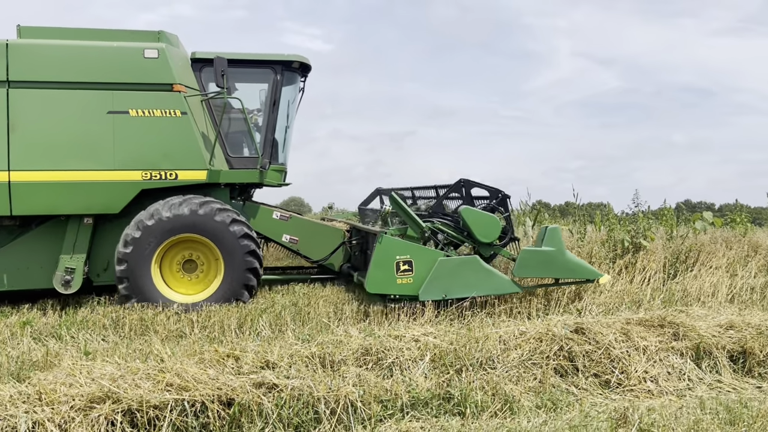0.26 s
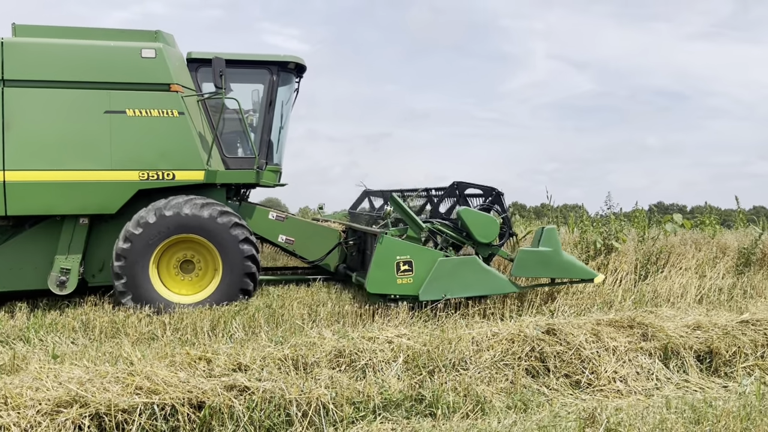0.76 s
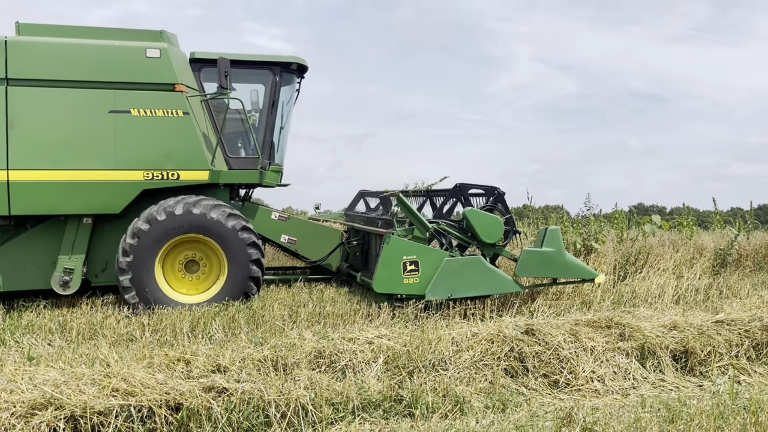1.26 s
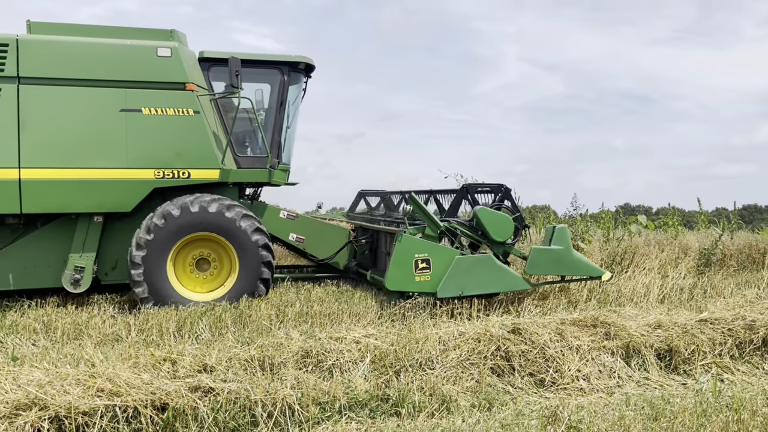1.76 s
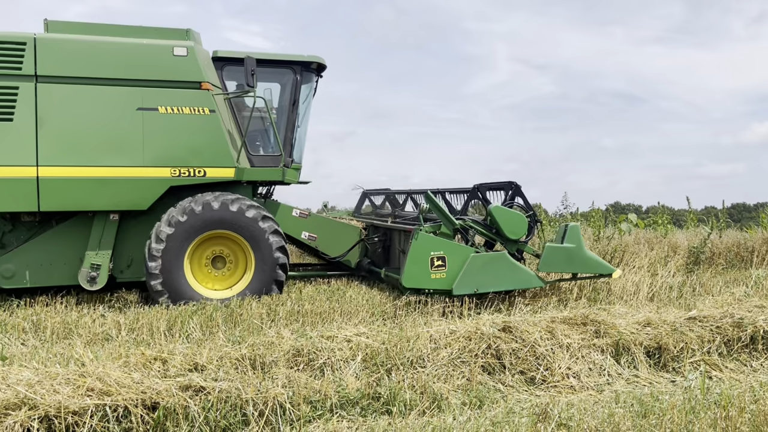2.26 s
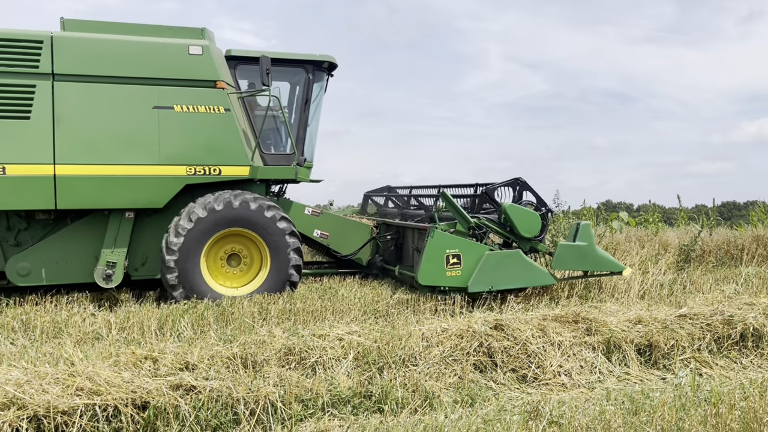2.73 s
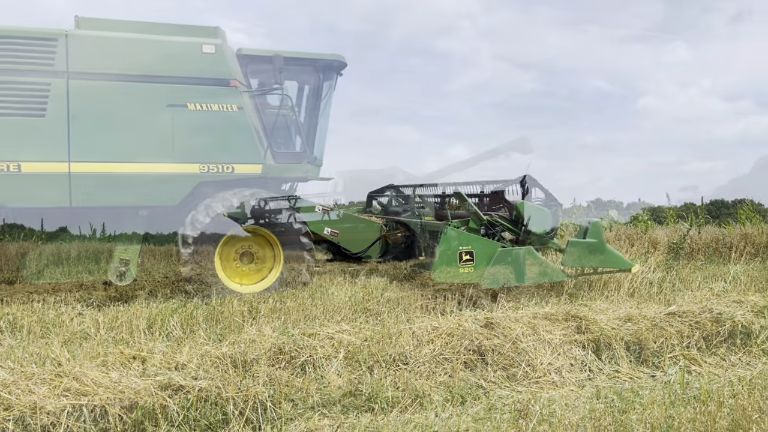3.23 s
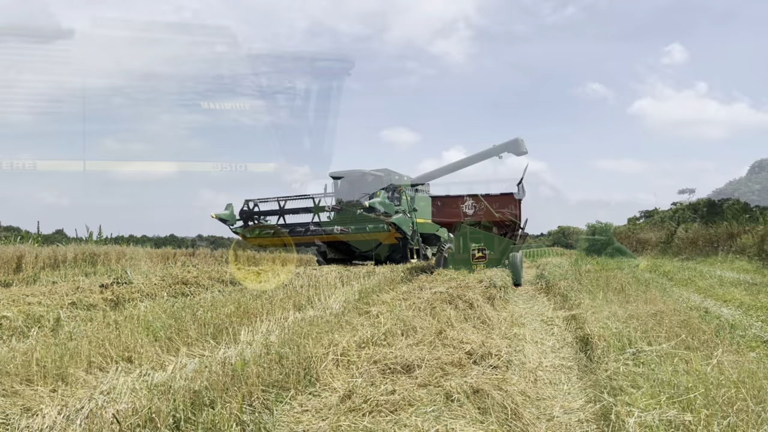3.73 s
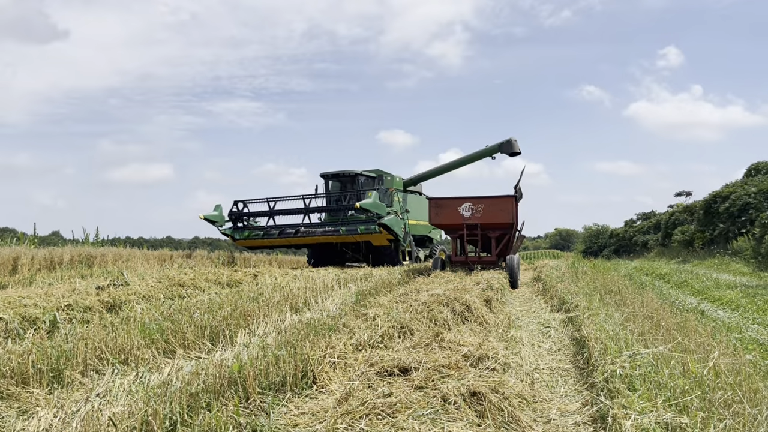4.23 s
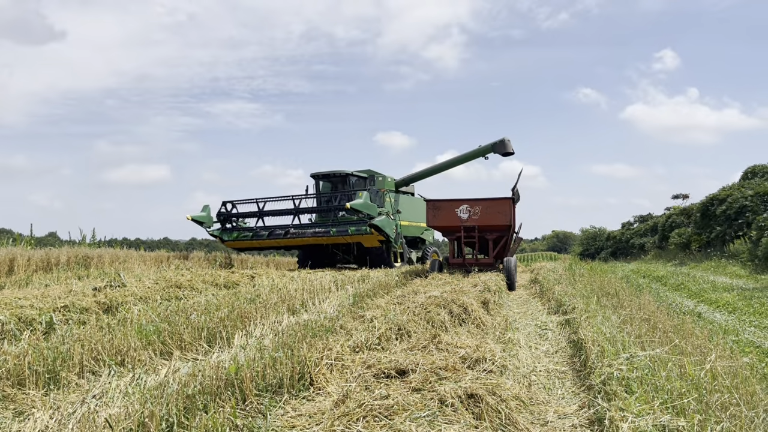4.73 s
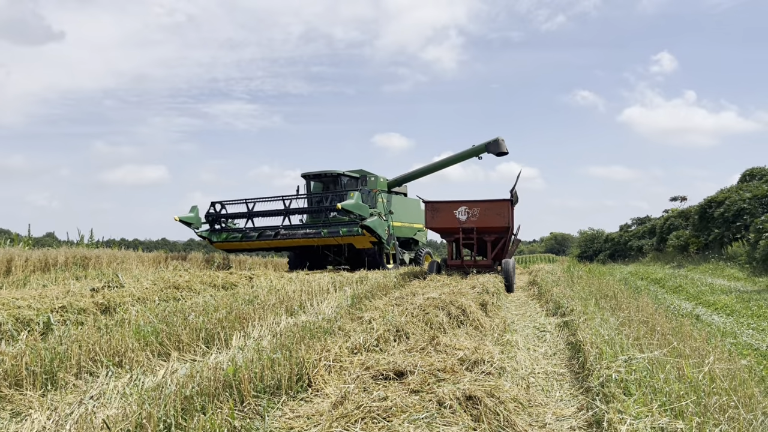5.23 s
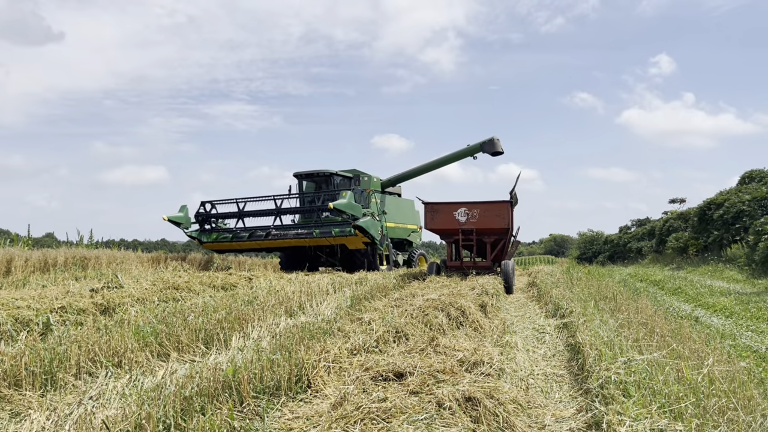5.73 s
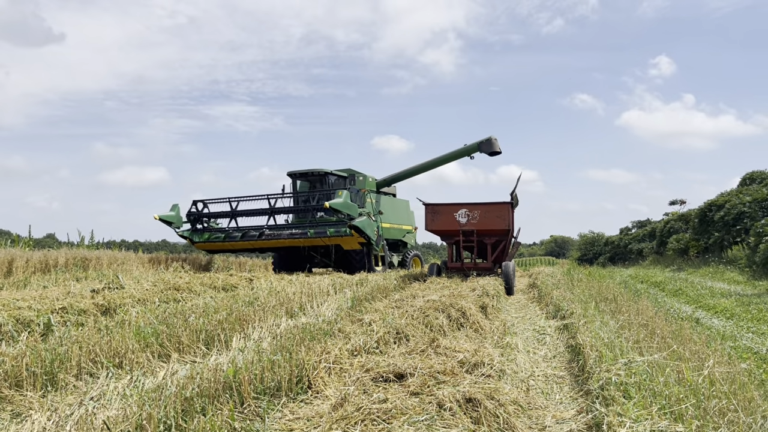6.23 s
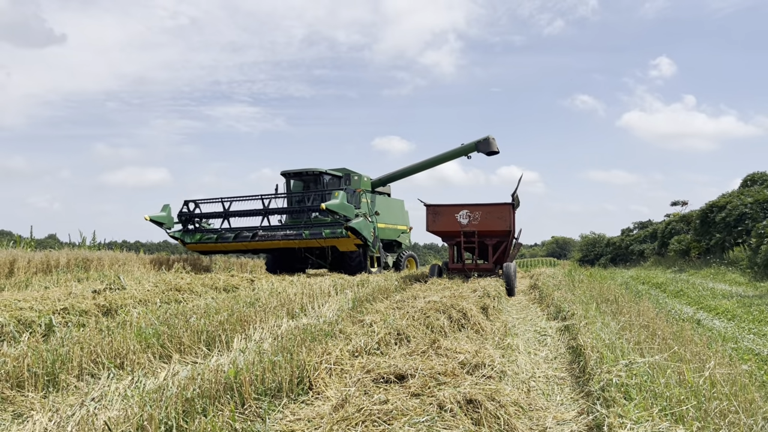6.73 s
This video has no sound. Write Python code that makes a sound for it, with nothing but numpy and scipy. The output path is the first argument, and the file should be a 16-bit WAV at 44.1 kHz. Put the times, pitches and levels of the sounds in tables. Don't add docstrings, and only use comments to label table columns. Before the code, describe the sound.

Loud threshing roar, pump whine and crackling straw at close range dissolve into softer twin engine drones, a thin whine and light wind buffeting.

```python
import sys
import numpy as np
from scipy import signal
from scipy.fft import rfft, irfft, next_fast_len
from scipy.io import wavfile
from scipy.ndimage import uniform_filter1d

SR = 44100
rng = np.random.default_rng(int(sys.argv[2]) if len(sys.argv) > 2 else 0)


def volts_from_db(level):
    exponent = np.asarray(level, float) / 20
    return 10 ** exponent


def pcm_store(signal):
    levels = np.round(np.clip(np.atleast_2d(signal), -1, 1) * 32767)
    wavfile.write(sys.argv[1], SR, levels.astype(np.int16).T)


N = 307818

# (start [s], end [s])
DISSOLVE = (3.0, 3.92)


def evened(x):
    return x / np.sqrt(np.mean(abs(x) ** 2) + 1e-20)


def read(points, hz):
    f, value = np.transpose(points)
    return np.interp(np.log(hz + 1), np.log(f + 1), value)


def columns(rows, t):
    s, *values = np.transpose(rows)
    return [np.interp(t, s, v) for v in values]


def bumps(t, s, height, half_s):
    return (height * np.exp(-((t[:, None] - s) / half_s) ** 2)).sum(axis=1)


def wander(rate):
    knots_per_s = 40
    knots = rng.standard_normal(int(N / SR * knots_per_s) + 4)
    smooth = signal.filtfilt(*signal.butter(2, np.clip(rate / 20, .01, .95)), knots)
    return np.interp(np.arange(N) / SR * knots_per_s, np.arange(len(knots)), evened(smooth))


def noise(spectrum, patchy_db, flicker_db):
    frames = N // 512 + 6
    hz = np.fft.rfftfreq(2048, 1 / SR)
    a, b, c, d, patches = rng.standard_normal((frames, len(hz), 5)).T
    patches = uniform_filter1d(patches, size=14, axis=0)
    patches = evened(uniform_filter1d(patches, size=4, axis=1))
    level = volts_from_db(read(spectrum, hz)[:, None] + patchy_db * patches)
    z = np.array([a + 1j * b, c + 1j * d]) * level
    pair = evened(signal.istft(z, nperseg=2048, noverlap=1536)[1][:, :N])
    return pair * volts_from_db(flicker_db * wander(28))


def whine(hz, db, rough):
    turns = np.cumsum(hz * np.ones(N)) / SR + rng.random()
    height = 1 + rough * wander(5.3)
    shake = rough * wander(19.6)
    return np.sqrt(2) * volts_from_db(db) * (height * np.exp(2j * np.pi * turns + 1j * shake)).real


def ports(direct, diffuse, table):
    size = next_fast_len(N)
    hz = np.fft.rfftfreq(size, 1 / SR)
    f, *values = np.transpose(table)
    same, lead, balance_db = (np.interp(hz, f, v) for v in values)
    treble = np.clip((hz - 8000) / 400, 0, 1)
    bass = np.clip(1.5 - hz / 300, 0, 1)
    same = np.clip(same + treble * (.9 - same) + 0.59 * bass * (1 - same), 0, 1)
    in_step_hz, turn_hz = 8620, 3270
    lead += treble * (2 * np.pi * (hz - in_step_hz) / turn_hz - lead)
    tilt = volts_from_db(balance_db * (1 - treble) / 2)
    tones, left, other = rfft(direct, size), rfft(diffuse[0], size), rfft(diffuse[1], size)
    right = (tones + same * left) * np.exp(1j * lead) + np.sqrt(1 - same ** 2) * other
    return irfft(np.array([(tones + left) * tilt, right / tilt]), size)[:, :N]


# (frequency [Hz], level [dB per Hz])
WIND = [(25, -24), (40, -8), (55, 7), (75, 5), (110, -1), (160, -7.5), (230, -9.5), (350, -22), (500, -54)]
# (time [s], peak level [dB], half length [s])
GUSTS = [(3.942, -33, 0.059), (4.082, -38, 0.059), (4.23, -30, .05), (4.377, -30, 0.047), (4.501, -39, .05),
         (5.12, -31, 0.038), (5.52, -33, 0.034), (5.686, -37, .03), (5.797, -34, 0.038),
         (5.987, -28.5, 0.035), (6.516, -40, 0.028), (6.89, -45, 0.032)]


def wind(t):
    lull_db, shared = -52, .25
    s, gust_db, half_s = np.transpose(GUSTS)
    strength = volts_from_db(lull_db) + bumps(t, s, volts_from_db(gust_db), half_s)
    eddies = strength * noise(WIND, patchy_db=2.5, flicker_db=1.5)
    return eddies + shared * eddies[::-1]


def shafts(lines, rough):
    return sum(whine(hz + waver_hz * wander(3.26), db, rough) for hz, db, waver_hz in lines)


def rattle(per_s, spread_db, level_db):
    size = volts_from_db(spread_db * np.minimum(rng.exponential(1, N), 4)) * (rng.random(N) < per_s / SR)
    kind = rng.integers(0, 40, N)
    t = np.arange(1200) / SR
    out = np.zeros(N)
    for k, hz in enumerate(np.geomspace(2300, 11500, num=40)):
        ping = np.sin(2 * np.pi * hz * t) * volts_from_db(-60 * t / 0.013)
        out += signal.oaconvolve(size * (kind == k), ping)[:N]
    return evened(out) * volts_from_db(level_db)


# (time [s], level above steady [dB])
BUNCHES = [
    (.5, 0.5),
    (0.781, 1),
    (1.94, 1.5),
    (2.58, 2.5),
    (3.05, 1),
    (4.5, 1),
    (5, 2.5),
    (5.95, 0),
    (6.4, 2),
]


def straw(t, colour, throb, level_db, patchy_db, flicker_db, spread_db):
    s, db = np.transpose(BUNCHES)
    swell_db = bumps(t, s, db, half_s=0.058)
    hiss = throb * noise(colour, patchy_db, flicker_db) + rattle(500, spread_db, level_db=-20)
    return volts_from_db(level_db + swell_db) * hiss


# (time [s], peak level [dB], ring pitch [Hz])
CLACKS = [(0.3294, -32, 8460), (0.7994, -28, 4400), (1.0694, -29, 8220), (1.1494, -25, 4610),
          (1.3164, -35, 6908), (1.9194, -32, 8726), (1.9594, -35, 8564), (2.3494, -26, 8350),
          (2.5894, -27, 4314), (2.7204, -19, 6003), (2.9294, -39, 8410), (3.3994, -28, 8750),
          (4.1495, -40, 8500), (4.4194, -50, 4500), (4.9494, -50, 8560), (4.9894, -41, 4400),
          (5.0993, -44, 6470), (5.4241, -42, 4500), (5.4494, -48, 4470), (5.6194, -47, 7500),
          (5.9085, -40, 4610), (6.1994, -49, 4500), (6.6594, -40, 7460)]
# (time [s], peak level [dB], ring pitch [Hz])
PINGS = [
    (0.9562, -25, 11100),
    (1.3594, -31, 7660),
    (1.4473, -24.5, 5400),
    (1.5894, -36, 7690),
    (5.7369, -44, 10920),
    (6.3619, -40, 8300),
    (3.802, -35, 9300),
]
# (time [s], peak level [dB], ring pitch [Hz])
SNAPS = [
    (.4818, -7.5, 7660),
    (2.499, -28, 3100),
    (2.7095, -12, 8350),
    (3.4, -29, 1900),
]
# (time to fall 60 dB [s], ring share [0-1])
CLACK_RING, PING_RING, SNAP_RING = (0.052, 0.12), (.06, 0.36), (0.011, 0.11)


def clacks():
    out = np.zeros(N + 4000)
    t = np.arange(4000) / SR
    kinds = (CLACKS, CLACK_RING), (PINGS, PING_RING), (SNAPS, SNAP_RING)
    knocks = [row + kind for rows, kind in kinds for row in rows]
    bright = signal.butter(2, [3000, 12000], "band", fs=SR)
    cracks = evened(signal.lfilter(*bright, rng.standard_normal((len(knocks), 4000))))
    rise = 1 - np.exp(-t / .001)
    for (s, db, hz, t60, ring), crack in zip(knocks, cracks):
        blend = 0.34 * crack + ring * np.sin(2 * np.pi * hz * t)
        out[round(s * SR):][:4000] += volts_from_db(db - 60 * t / t60) * rise * blend
    return out[:N]


def pump(rows, voicing, rest, rough):
    hz, effort_db, bite_db = columns(rows, np.arange(N) / SR)
    faster = hz - np.mean(rows, axis=0)[1]
    out = np.zeros(N)
    for k, db, per_hz, share in voicing:
        out += whine(k * hz, effort_db + db + per_hz * faster + share * bite_db, rough)
    for k, db in rest:
        out += whine(k * hz, db, 2 * rough)
    return out, np.cumsum(hz) / SR


# (time [s], piston rate [Hz], effort [dB], valve bite [dB])
FAR_PUMP = [
    (3.4, 379.6, -37.5, 6),
    (3.8, 378.8, -44, -8),
    (4.1, 375.8, -50.5, 1),
    (4.7, 374.9, -46, -3),
    (5.1, 378.3, -48.5, 2),
    (5.8, 382, -47, 0),
    (6.35, 377, -47.5, 7),
    (6.6, 376.3, -46, 2.5),
    (6.98, 374, -45.5, -1),
]
# (multiple [-], level over effort [dB], level per speed [dB per Hz], valve share [-])
FAR_VOICING = [(1, 1.5, 0.16, 0), (2, -11, 0.95, .5), (4, -13.5, -1.1, 0.4), (5, -11, -0.35, 0.88)]
# (multiple [-], level [dB])
FAR_PUMP_REST = [(2.24, -60.5), (3, -69), (6, -66), (7, -71), (8, -70), (10, -71)]
# (frequency [Hz], level [dB], waver [Hz])
FAR_SHAFTS = [(38.3, -43.5, .2), (76.8, -40.5, .2), (84, -35, .2), (126, -47, .4), (153, -51, .5),
              (168, -48, 1), (187, -43.5, 2), (268, -59, .6), (418, -61, 1), (920, -63, 2), (1210, -66, 2)]
# (frequency [Hz], level [dB per Hz])
FAR_ROAR = [(24, -36), (40, -1), (60, -8.5), (92, -3), (129, -3.5), (184, -5), (284, -18.5), (375, -12.5),
            (424, -20.5), (535, -22.5), (824, -22.5), (992, -20.5), (1410, -27), (1480, -42), (1600, -45),
            (2080, -58), (3520, -120)]
# (frequency [Hz], level [dB per Hz])
FAR_HISS = [(1200, -36), (1500, 1), (2100, -2.5), (3000, -7.5), (3700, -8), (4000, -11.5), (5500, -14.5),
            (7000, -18), (8500, -17.5), (10500, -13.5), (11200, -16.5), (12000, -25.5), (12700, -26),
            (13300, -59)]
# (frequency [Hz], likeness [0-1], right leads by [rad], left minus right [dB])
FAR_PORTS = [(40, 0.88, -0.0, 1.1), (300, 0.85, 0.0, 1.5), (700, 0.24, -0.2, -0.3), (1100, 0.59, 0.3, 0.4),
             (1500, 0.64, 1.0, -0.8), (2000, 0.35, 0.8, 0.8), (2400, 0.47, -0.8, -0.8),
             (2900, 0.69, -1.4, 2.2), (3500, 0.69, -1.4, 2.6), (4200, 0.36, -1.0, 0.9),
             (5100, 0.11, -0.6, 1.8), (6000, 0.46, -0.2, 0.8), (7200, 0.41, -1.2, 2.1),
             (8000, 0.73, -0.6, 0.6)]


def far_view(t):
    whines, turns = pump(FAR_PUMP, FAR_VOICING, FAR_PUMP_REST, rough=.12)
    tones = whines + shafts(FAR_SHAFTS, rough=0.023) + clacks() * (t > 3.9)
    pulsing = 1 + .08 * np.cos(2 * np.pi * turns)
    body = volts_from_db(-35) * noise(FAR_ROAR, patchy_db=-0.1, flicker_db=-1.24)
    body += straw(t, FAR_HISS, pulsing, level_db=-49.5, patchy_db=1.7, flicker_db=0.6, spread_db=2.5)
    fade = np.interp(t, DISSOLVE, (0, 1)) ** 1.15
    return (ports(tones, body, FAR_PORTS) + wind(t)) * fade


# (time [s], piston rate [Hz], effort [dB], valve bite [dB]); the last rise slows the tones' fade-out
NEAR_PUMP = [(0, 257.6, -24.5, 0), (.2, 258.5, -26.5, -5), (.5, 260.7, -26.5, -6), (.8, 262.2, -28.5, -7.5),
             (1.05, 262, -30, 4), (1.5, 259.5, -30.5, 3.5), (1.85, 260.2, -27, -3), (2.25, 262.5, -30, 4),
             (2.6, 263.7, -25.5, 2.5), (3.1, 263.4, -25.5, -2.5), (3.55, 263.4, -25.5, 0),
             (4, 264, -19, -4)]
# (multiple [-], level over effort [dB], level per speed [dB per Hz], valve share [-])
NEAR_VOICING = [(1, 0.5, 0, -0.14), (2, -14, -0.74, -0.44), (5, -10, 0.05, 0.79)]
# (multiple [-], level [dB])
NEAR_PUMP_REST = [(3, -45), (4, -57), (5.11, -47), (4.89, -54), (9, -56), (9.22, -56), (10, -56)]
# (frequency [Hz], level [dB], waver [Hz])
NEAR_SHAFTS = [(38.6, -48, .6), (52, -44, 1), (64.6, -37.5, 2), (76, -40, 2), (116.5, -38, 1),
               (137, -39, 1), (349, -37, 2), (980, -49, 6), (6886, -66, 6)]
# (frequency [Hz], level [dB per Hz])
NEAR_ROAR = [(15, -42), (25, -15), (44, -29), (65, -5.5), (124, -6.5), (205, -6), (262, -6), (301, -4),
             (377, -3), (455, -7.5), (490, -14.5), (563, -14), (983, -15), (1210, -18.5), (1300, -18.5),
             (1440, -29), (1600, -52), (2080, -49.5), (3520, -120)]
# (frequency [Hz], level [dB per Hz])
NEAR_HISS = [(1200, -22), (1450, -4), (1800, 1.5), (2050, -3.5), (2450, 0), (2750, -5.5), (3050, -8.5),
             (5000, -13), (7000, -17), (7600, -12.5), (9000, -12), (10400, -8), (11800, -17.5),
             (13300, -31)]
# (frequency [Hz], likeness [0-1], right leads by [rad], left minus right [dB])
NEAR_PORTS = [(40, 0.98, -0.1, 1.4), (300, 0.99, -0.3, 2.0), (700, 0.93, -0.6, 4.1),
              (1100, 0.81, -0.8, 5.2), (1500, 0.09, -0.6, 2.6), (2000, 0.11, 3.1, 1.8),
              (2400, 0.77, -0.5, -1.0), (2900, 0.46, -1.3, 4.0), (3500, 0.72, -0.7, 3.7),
              (4200, 0.75, -0.6, 2.2), (5100, 0.42, -1.7, 4.2), (6000, 0.62, -0.1, 3.0),
              (7200, 0.55, -0.8, 3.9), (8000, 0.85, -0.7, 1.1)]


def near_view(t):
    fade = np.interp(t, DISSOLVE, (1, 0))
    whines, _ = pump(NEAR_PUMP, NEAR_VOICING, NEAR_PUMP_REST, rough=.17)
    firing = 1 + .04 * np.cos(2 * np.pi * 124 * t + .8 * wander(4))
    body = volts_from_db(-22) * noise(NEAR_ROAR, patchy_db=.6, flicker_db=0.04)
    body += straw(t, NEAR_HISS, firing, level_db=-34, patchy_db=1.34, flicker_db=0.49, spread_db=7.0)
    tones = fade * (whines + shafts(NEAR_SHAFTS, rough=0.47)) + clacks() * (t < 3.9)
    return ports(tones, fade * body, NEAR_PORTS)


def scene():
    t = np.arange(N) / SR
    return far_view(t) + near_view(t)


def low_pass(x):
    return signal.sosfilt(signal.butter(12, 13220, fs=SR, output="sos"), x)


def record(dry):
    mix = signal.sosfilt(signal.butter(4, 33, "high", fs=SR, output="sos"), dry)
    return low_pass(mix)


dry = scene()
out = record(dry)
pcm_store(out)
```